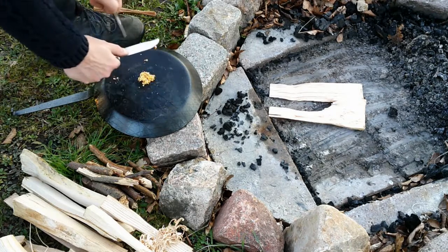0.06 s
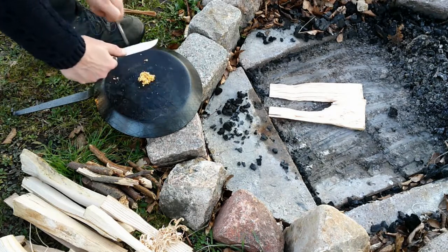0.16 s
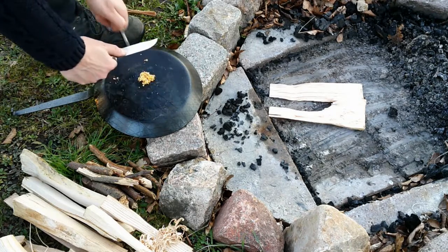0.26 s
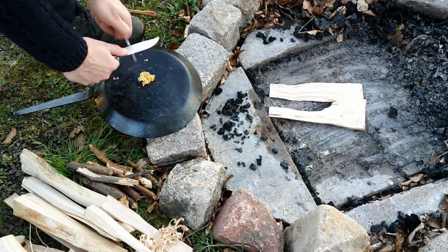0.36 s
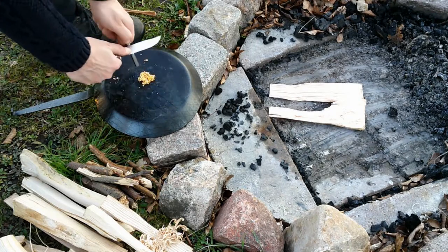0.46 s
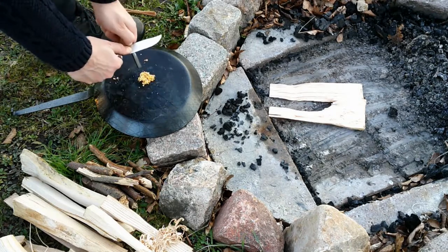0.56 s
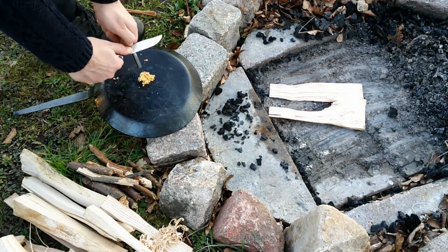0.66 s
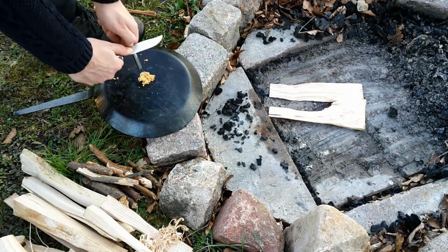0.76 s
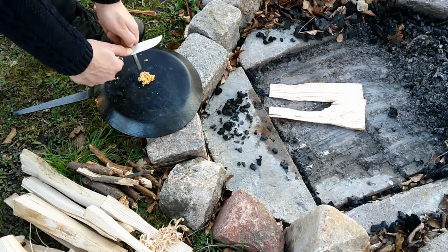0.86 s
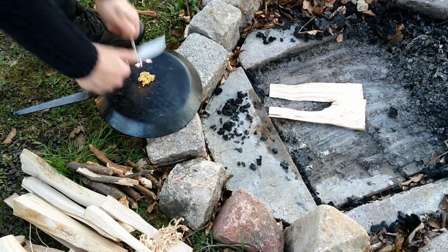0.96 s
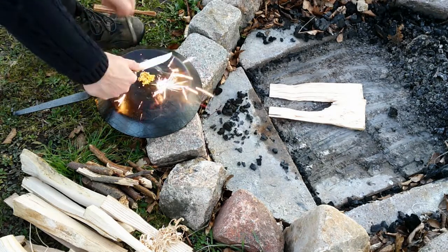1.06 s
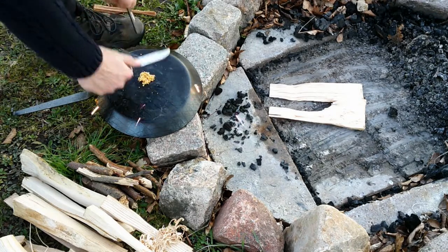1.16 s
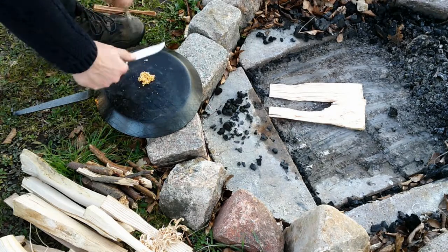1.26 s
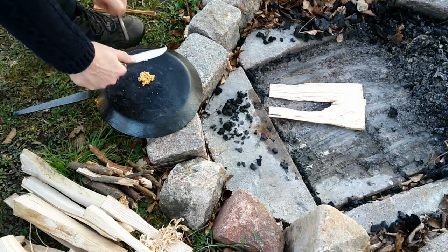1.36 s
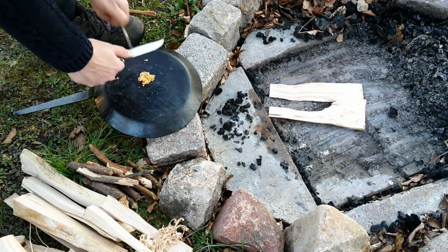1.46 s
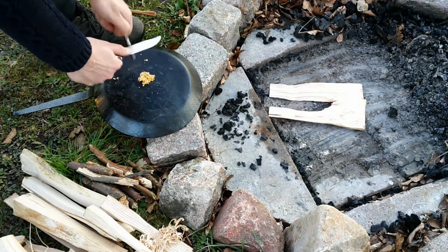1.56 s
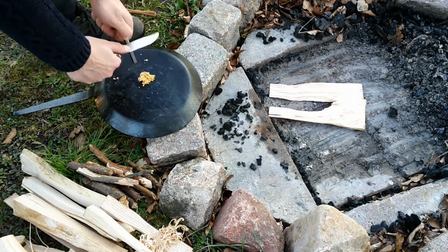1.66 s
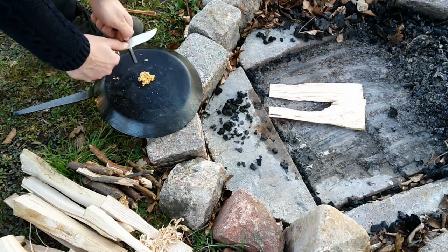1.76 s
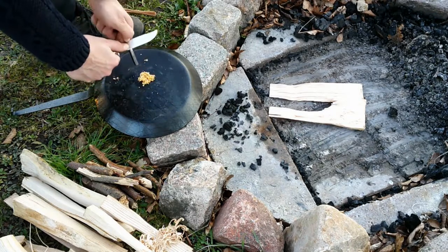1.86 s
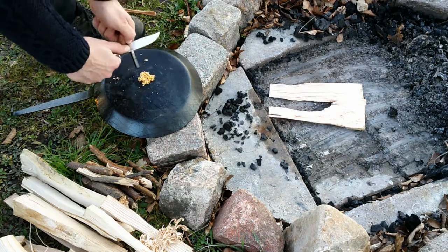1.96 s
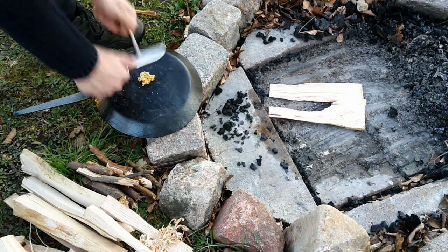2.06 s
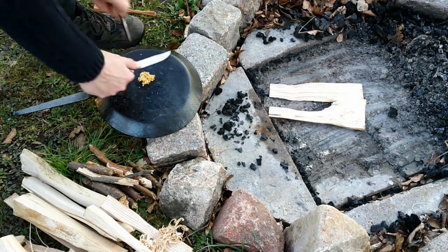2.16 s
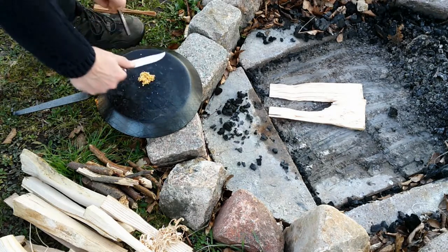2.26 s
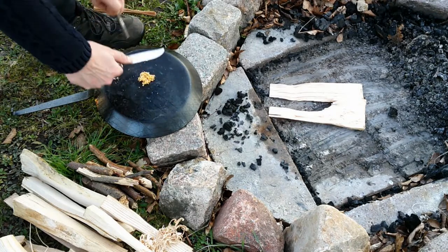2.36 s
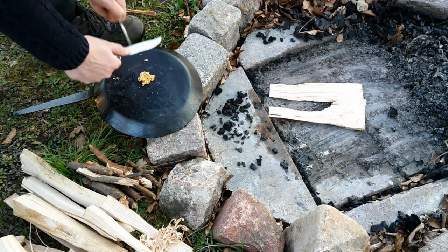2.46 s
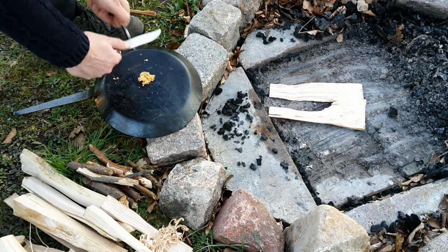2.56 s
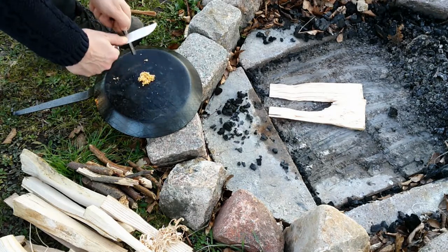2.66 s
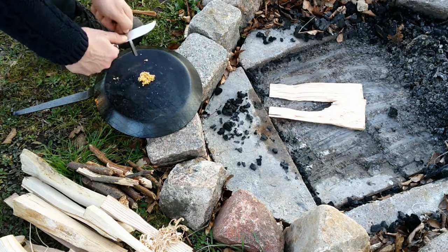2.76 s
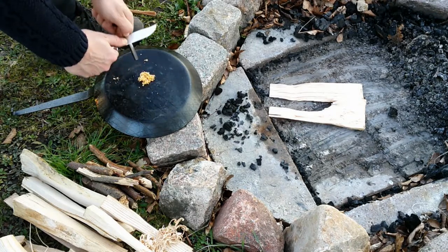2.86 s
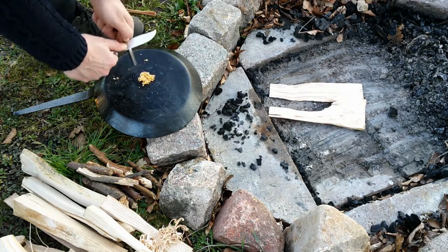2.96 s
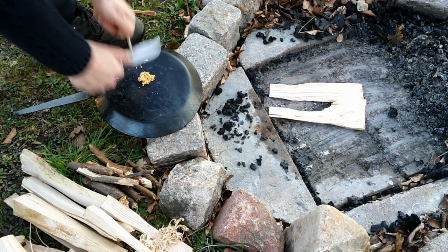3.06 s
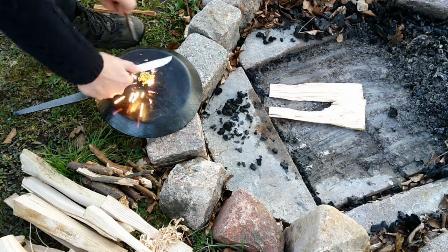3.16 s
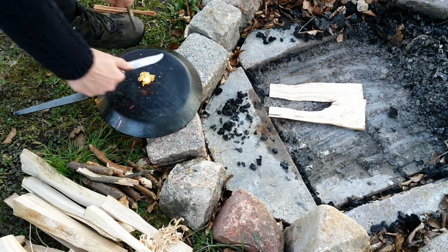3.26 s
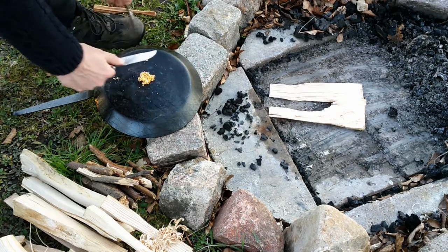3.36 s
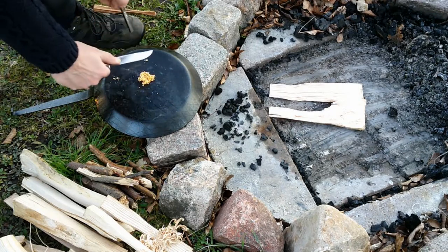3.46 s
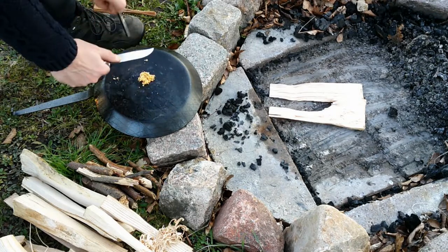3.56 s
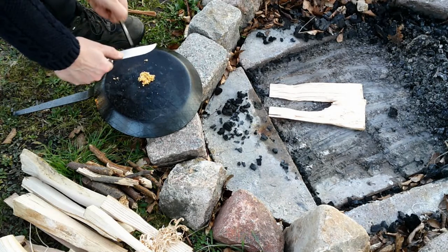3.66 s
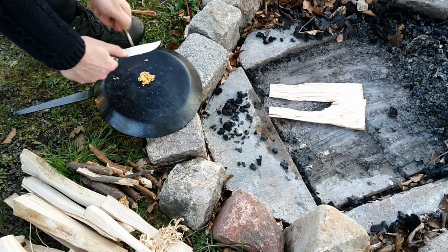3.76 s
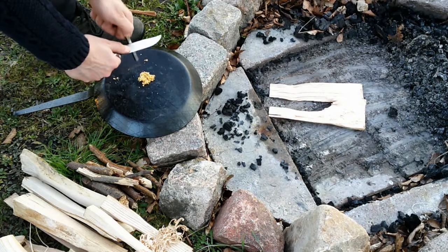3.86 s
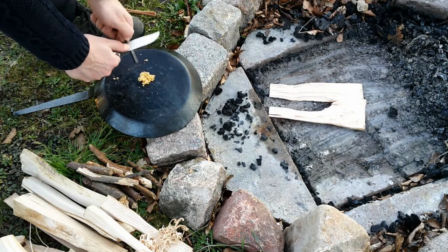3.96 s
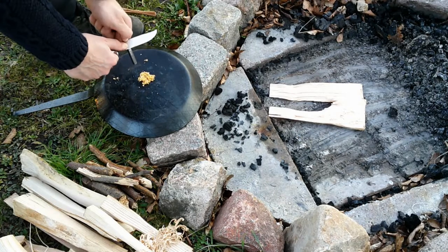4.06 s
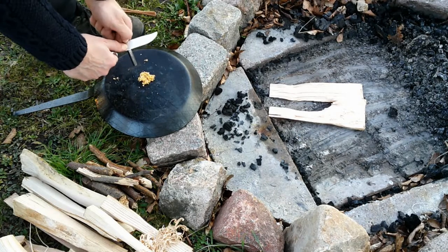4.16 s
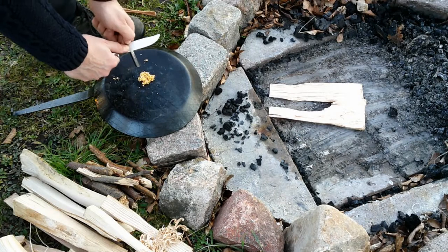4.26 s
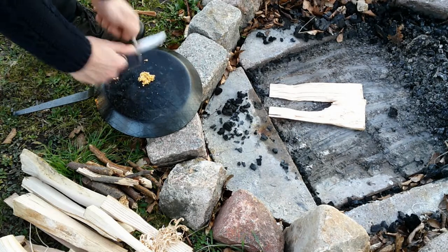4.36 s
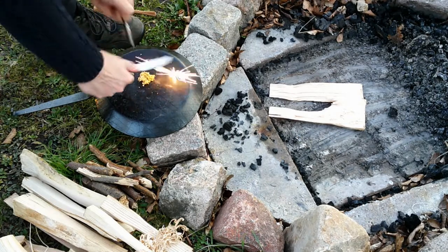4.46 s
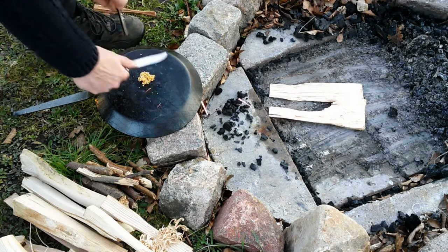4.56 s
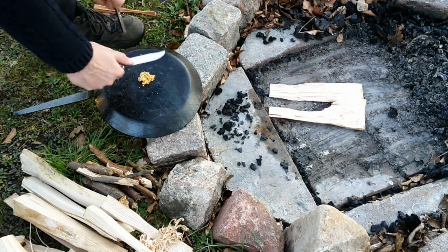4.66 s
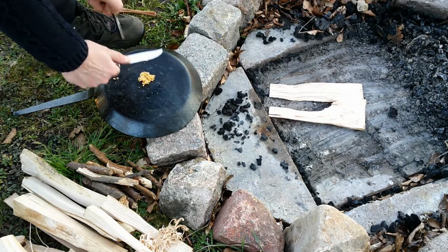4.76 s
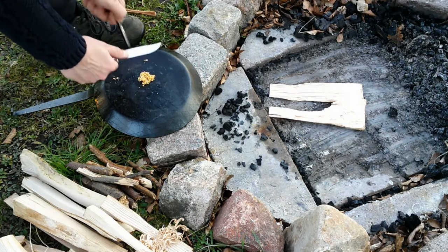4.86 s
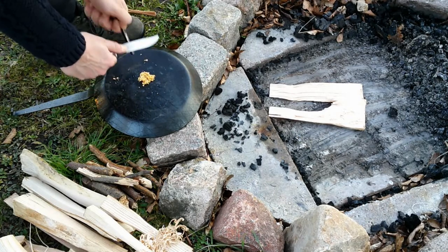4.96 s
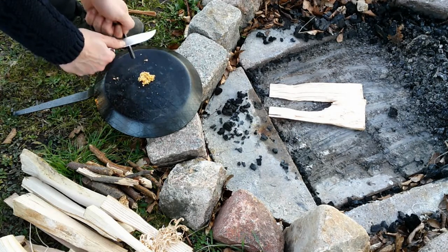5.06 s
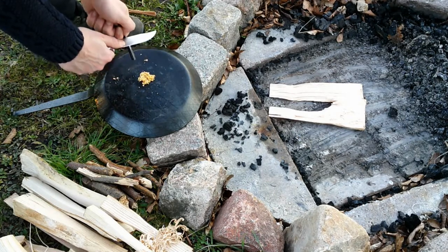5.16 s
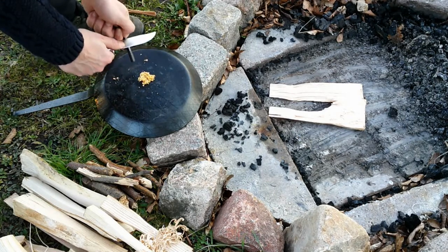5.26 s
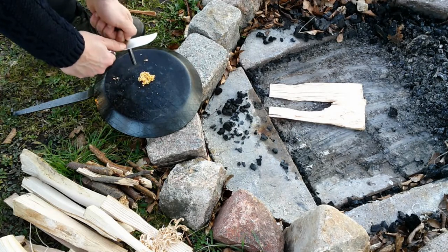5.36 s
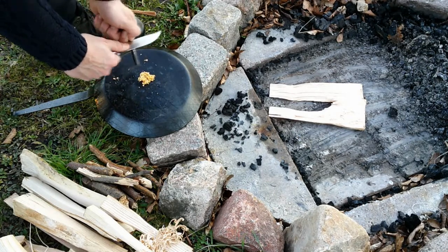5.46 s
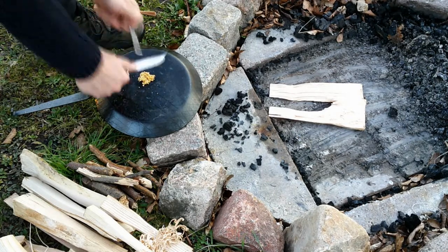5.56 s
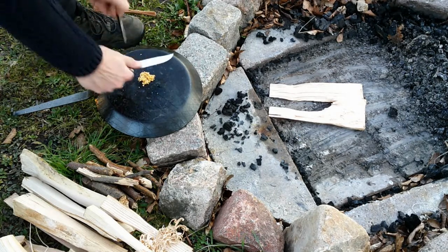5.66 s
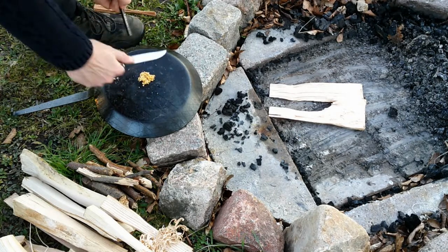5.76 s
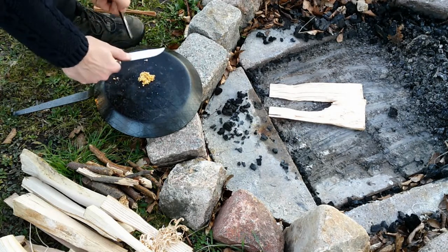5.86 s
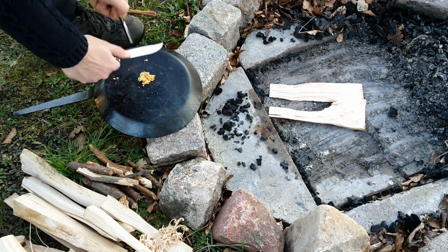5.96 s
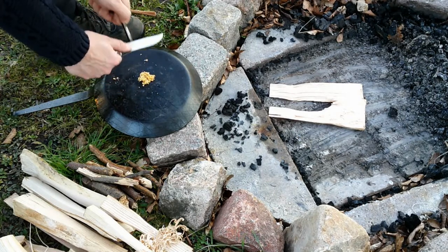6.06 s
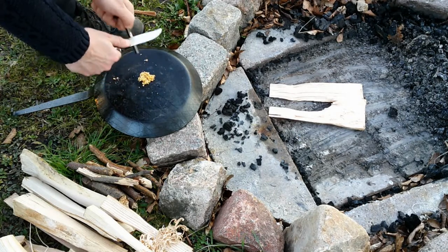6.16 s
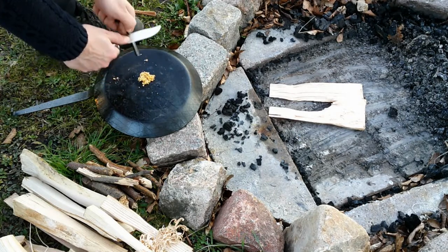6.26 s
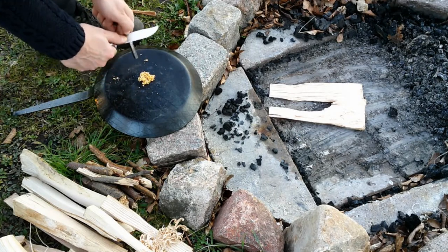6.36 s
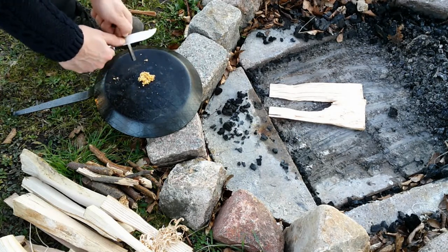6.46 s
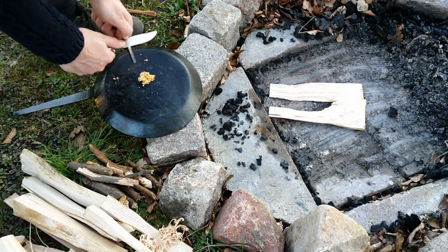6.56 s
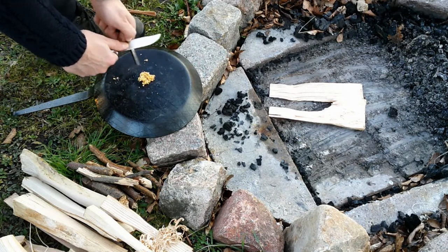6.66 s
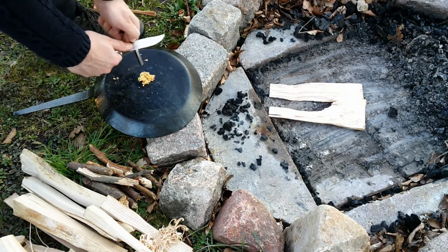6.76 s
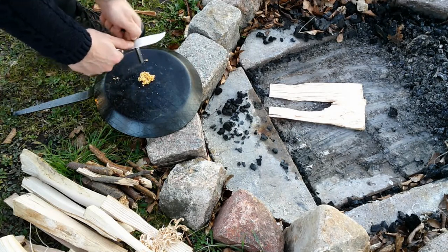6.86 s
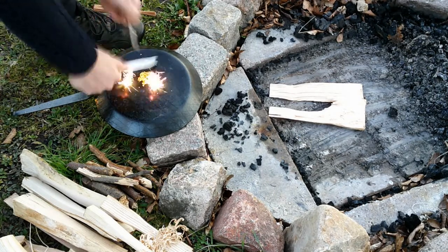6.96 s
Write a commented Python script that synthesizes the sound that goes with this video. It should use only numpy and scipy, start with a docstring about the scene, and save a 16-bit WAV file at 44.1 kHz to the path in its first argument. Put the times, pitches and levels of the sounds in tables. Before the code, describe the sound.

Close and nearly dry, a knife edge rasps down a fire-starting rod six times, about once every second or so. Each scrape is a very short, gritty, bright metallic zip, often followed by a soft puff and crackling fizz of sparks. Between strokes the blade clicks lightly on the rod with a tiny steel ring. Far off in trees, small birds trill, whistle and twitter above a very low outdoor rumble.

```python
"""A knife is scraped hard down a firesteel six times, close by, over an upturned steel pan outdoors.
Each rasp is coloured grit shaped by the force; sparks puff, fizz and snap, and the blade taps the rod as a
short click with a ringing steel. Far off in the trees small birds sing, as gliding sine tones.
Behind it all lies a low, distant rumble of shaped noise; the camera takes in no treble above 9 kHz."""
import sys
import numpy as np
from scipy import signal
from scipy.fft import rfft, irfft, next_fast_len
from scipy.io import wavfile
from scipy.ndimage import map_coordinates

SR = 44100
rng = np.random.default_rng(int(sys.argv[2]) if len(sys.argv) > 2 else 0)


def log_audio(samples):
    """Write samples as a 16-bit WAV file to the path given in sys.argv[1]."""
    # one column per channel
    frames = np.atleast_2d(samples).T
    # limit to full scale, then quantise
    limited = np.clip(frames, -1, 1)
    pcm = np.round(limited * 32767).astype(np.int16)
    wavfile.write(sys.argv[1], SR, pcm)


N = 309582

# strokes of the blade: (bite time [s], length [s], body level [dB], treble over body [dB],
#   swell of the force in mid-stroke [dB], tilt [dB per octave], freedom to ring [1 = usual],
#   pitch this hold damps least [Hz], pitch it damps most [Hz])
STROKES = [(.975, 0.028, -28.5, -15.5, 2, -2.5, 1, 2570, 2950),
           (2.061, .027, -21.5, -11.5, 10, 0, 1.17, 2720, 1160),
           (3.08, .023, -22.3, -15.5, 11, -1, 1.1, 1750, 2560),
           (4.402, .024, -23, -10, 2, 1, .9, 2320, 2870),
           (5.558, 0.015, -23.5, -16.5, 4, -2, 1.54, 1280, 2870),
           (6.949, .019, -20, -10.5, 2, .2, .9, 1490, 1080)]
# resonances of blade and rod pressed together: (pitch [Hz], width [Hz], lift at usual freedom [dB])
BLADE_RESONANCES = [(1220, 330, 6), (1812, 266, 9.5), (2543, 160, 12.5), (3770, 410, 8.5), (2794, 140, 7),
                    (670, 120, 4.5), (2327, 57, -1), (1502, 110, -4), (4480, 99, -2.5), (5280, 266, 17),
                    (6340, 600, 9), (7870, 330, 13)]
# the rasp under those resonances: (frequency [Hz], relative density [dB per Hz])
RASP_SPECTRUM = [(100, -41.5), (300, -22), (550, -17), (850, -10), (1150, -3.5), (1700, 0), (2200, -2),
                 (3200, -5), (4600, -15), (5700, -7.5), (7200, -14), (9000, -23)]
# the edge gliding lightly: (frequency [Hz], relative density [dB per Hz])
SKIM_SPECTRUM = [(300, -9.5), (1200, 0), (2600, -4.5), (4500, -4.5), (5500, -10), (7000, -8.5), (8500, -18)]
GRIP_S, GRIP_DB = .0095, -16.5  # the edge grips this long before it bites, with this much force
SKIM_S, SKIM_DB = .033, -48  # the light glide before the grip
HARDEST_SHARE, EASE_DB = 0.31, -3  # force peaks at this share of the stroke; slip-off force over bite force
TILT_FROM_HZ, SPLIT_HZ = 700, 4400  # the tilt runs between these; treble lies above the second
FREE_DB, DAMPED_DB, HOLD_WIDTH_HZ = 4, -6, 250  # ring gained and lost around the hold's two pitches

# flares of burning sparks: (time [s], length [s], puff level [dB])
FLARES = [(1.009, 0.025, -41), (1.04, .034, -51), (3.108, 0.026, -45), (3.144, 0.015, -48),
          (3.221, 0.04, -55.5), (4.43, .022, -49.5), (5.627, 0.011, -58.5), (6.976, .039, -49.5)]
# puff of a flare: (frequency [Hz], relative density [dB per Hz])
PUFF_SPECTRUM = [(150, -21.5), (450, -12.5), (800, 4), (1300, -2), (1800, -7), (2600, 1.5), (4200, -7.5),
                 (6000, -18.5)]
# fizz of a flare: (frequency [Hz], relative density [dB per Hz])
FIZZ_SPECTRUM = [(2500, -32), (4500, -20), (5400, 4), (6400, 9.5), (7200, -5), (8500, -18.5)]
FIZZ_DB = -4.5  # fizz over puff
# single sparks bursting: (time [s], relative level [dB])
POPS = [(1.011, -33), (3.23, -33), (3.244, -34), (3.2497, -35.5), (3.285, -42.5), (3.344, -40),
        (4.472, -43)]

# blade touching the rod: (time [s], peak level of the click [dB])
TAPS = [(0.438, -36), (0.9648, -27.5), (1.6307, -34), (2.6787, -29.5), (3.887, -35.5), (4.366, -49),
        (5.0606, -35), (5.541, -35), (6.1671, -31)]
# click of the edge on the rod: (frequency [Hz], relative density [dB per Hz])
CLICK_SPECTRUM = [(300, -28), (1200, -9.5), (1800, -1), (2700, -2.5), (4500, -12), (6500, -7), (8500, -22)]
# modes of the lightly held steel: (pitch [Hz], typical relative level [dB], t60 [s])
STEEL_MODES = [(1230, -7.5, 0.048), (1483, -29, .1), (1776, 2, 0.056), (2120, -14.5, 0.061),
               (2510, -2.5, 0.063), (2900, -7, 0.059), (3450, -6.5, .05), (3900, -10, .03),
               (5330, -4, 0.043), (6220, -9.5, 0.041)]

# trills: (start [s], number of notes, first interval [s], first pitch [Hz], first level [dB], last level [dB])
TRILLS = [(-.011, 7, .096, 4120, -53.5, -58.5), (5.227, 11, .0892, 4480, -57, -52.5)]
# one scoop of the trill: (time into the note [s], pitch over the dip [ratio], relative level [dB])
SCOOP = [(0, 1.1, -12), (.009, 1.03, -4), (.019, 1.0, 0), (.029, 1.015, 0), (.042, 1.085, 1),
         (.052, 1.155, 0), (.06, 1.185, -15)]
TRILL_HZ, TRILL_SETTLE_S = 4040, .23  # pitch the run settles to, and its time constant
TRILL_SLOWING_S = 0.0011  # growth of the interval per note
TRILL_NARROWING = 2.4  # exponent: a higher note scoops less widely
# two-note song, each note's turn: (first time [s], middle pitch [Hz], level [dB], repeats)
SEESAW = [(2.075, 4173, -61.5, 6), (2.338, 3094, -63.5, 5)]
SEESAW_PERIOD_S, SEESAW_NOTE_S = .47, 0.072
SEESAW_SAG = 0.028  # fall over one note, as a share of its pitch
# thin, high calls: (time [s], length [s], pitch held [Hz])
THIN_CALLS = [(4.171, 0.14, 7220), (4.41, 0.19, 7170), (4.643, 0.18, 7300)]
THIN_DB, THIN_SCOOP, THIN_SCOOP_S = -60, .2, .009  # starts this share below its pitch; time constant of the rise
# slurred whistles: (time [s], length [s], start pitch [Hz], end pitch [Hz], arch [share of pitch], level [dB])
SLURS = [(0.146, .095, 2900, 3020, .04, -64), (1.124, 0.083, 5200, 4900, -0.0017, -61),
         (1.266, 0.087, 3250, 3240, -0.039, -54), (1.346, 0.13, 3278, 3290, -0.00042, -52.5),
         (1.564, 0.1, 5310, 4830, -.012, -56), (1.693, 0.071, 4890, 4850, 0, -59),
         (1.84, 0.19, 3140, 3090, .01, -55), (2.313, 0.057, 4540, 4630, 0.076, -54.5),
         (2.421, .118, 5340, 3210, 0.024, -53.5), (4.948, .11, 5270, 5370, .025, -56),
         (5.062, 0.12, 5450, 5390, 0.017, -62.5), (5.153, 0.081, 5350, 5150, -.02, -60),
         (6.275, 0.15, 2800, 3115, -0.0028, -63.5), (6.598, 0.072, 2850, 3100, .02, -61.5)]
# bouts of twittering: (start [s], end [s], mean spacing [s], typical pitch [Hz], level [dB])
TWITTER = [(2.192, 2.32, 0.097, 4020, -56), (2.619, 2.64, .025, 3400, -62),
           (2.699, 2.79, 0.023, 3450, -59.5), (6.295, 6.54, 0.029, 3790, -57),
           (6.585, 6.78, .079, 3833, -56.5), (6.81, 6.9, 0.033, 3980, -57.5)]
CHIRP_S, CHIRP_BEND = .016, .27  # length of one chirp; curvature of its pitch

# scattered tail among the trees: (frequency [Hz], t60 [s])
TREE_DECAY = [(500, 0.55), (3000, 0.99), (8000, 0.71)]
# distant rumble and thin hiss: (frequency [Hz], relative density [dB per Hz])
AIR_SPECTRUM = [(12, -29.5), (22, -7), (50, -7.5), (90, -3.5), (135, -1.5), (200, -3.5), (340, -8.5),
                (780, -9.5), (1450, -13), (2600, -16), (3520, -21), (5200, -27), (7300, -22.5), (8800, -38)]
ROLL_HZ, TOP_HZ = 8050, 9050  # start of the camera's roll-off, and its limit


def amp(db):
    """Decibels to amplitude."""
    return 10 ** (np.asarray(db) / 20)


def unit(x):
    """x brought to an rms of 1."""
    return x / np.sqrt(np.mean(x ** 2) + 1e-20)


def along(points, hz):
    """Values at hz between (frequency, value) points on a log axis."""
    f, v = np.transpose(points)
    return np.interp(np.log(hz + 1), np.log(f + 1), v)


def seconds(length):
    """A time axis."""
    return np.arange(int(length * SR)) / SR


def add(track, s, x):
    """Mix x into the track from time s, cut to the track's ends."""
    start = round(s * SR)
    x = x[max(-start, 0):max(N - start, 0)]
    track[max(start, 0):][:len(x)] += x


def wobble(rate, t):
    """A smooth random curve, rate knots a second."""
    return map_coordinates(rng.standard_normal(1024), [t * rate], mode="wrap")


def coloured(x, gain_db, size=4096):
    """x through the causal minimum-phase filter with this dB gain over frequency."""
    gain = amp(gain_db(np.fft.rfftfreq(size, 1 / SR)))
    cepstrum = irfft(np.log(gain + 1e-6))
    # fold the cepstrum onto positive times
    cepstrum[1:size // 2] *= 2
    cepstrum[size // 2 + 1:] = 0
    impulse = irfft(np.exp(rfft(cepstrum)))
    return signal.fftconvolve(x, impulse)[:len(x)]


def grit(t, rate, spread_db):
    """Tiny fractures at random moments, rate a second, their sizes spread by spread_db; rms 1."""
    happens = rng.random(len(t)) < rate / SR
    sign = np.sign(rng.standard_normal(len(t)))
    size = amp(spread_db * rng.standard_normal(len(t)))
    return unit(happens * sign * size)


def strokes(edge=0.0039, release=0.0045, grab_db=4, brighten_db=3, dull_db=-8, damp_db=-12):
    """The edge skims the rod, grips, bites, tears off chips and slips off the end."""
    out, t = np.zeros(N), seconds(.16)
    highpass = signal.butter(4, SPLIT_HZ, "high", fs=SR, output="sos")
    for bite, length, db, treble_db, swell_db, tilt_db, freedom, free_hz, damped_hz in STROKES:
        grip, hardest, off = bite - GRIP_S, bite + HARDEST_SHARE * length, bite + length
        start = grip - SKIM_S
        now = start + t

        # the hands damp the lower resonances differently on each stroke
        peaks = [(f, width, lift * (freedom if f < SPLIT_HZ else 1)) for f, width, lift in BLADE_RESONANCES]
        peaks += [(free_hz, HOLD_WIDTH_HZ, FREE_DB), (damped_hz, HOLD_WIDTH_HZ, DAMPED_DB)]

        def ring_db(hz):
            return sum(lift / (1 + (2 * (hz - f) / width) ** 2) for f, width, lift in peaks)

        def lean_db(hz):
            return tilt_db * np.log2(np.clip(hz, TILT_FROM_HZ, SPLIT_HZ) / TILT_FROM_HZ)

        # a light hiss swells, then fades between grip and bite
        glide = np.tanh(2 * t / SKIM_S) * np.clip((bite - now) / GRIP_S, 0, 1)
        hiss = glide * grit(t, rate=4400, spread_db=1.0)
        skim = coloured(hiss, lambda hz: along(SKIM_SPECTRUM, hz) + ring_db(hz))
        add(out, start, amp(SKIM_DB) * unit(skim) * np.sqrt(np.mean(glide ** 2)))

        # the force jumps at the grip and again at the bite
        moments = np.sort([grip - edge, grip, bite - edge, bite, hardest, off, off + release, off + 2 * release])
        levels_db = [-90, GRIP_DB, GRIP_DB + grab_db, -swell_db, 0, EASE_DB - swell_db, -26, -90]
        force_db = np.interp(now, moments, levels_db)
        chips = amp(force_db + wobble(299.4, t)) * grit(t, rate=7000, spread_db=2.5)
        rasp = coloured(chips, lambda hz: along(RASP_SPECTRUM, hz) + ring_db(hz) + lean_db(hz))
        treble = signal.sosfiltfilt(highpass, rasp)
        body = rasp - treble

        # the treble sets in with the bite, grows in flurries as the blade gathers speed, drops after contact
        waiting = np.clip((bite - now) / edge, 0, 1)
        speed = np.clip((now - hardest) / length, -.5, .5) * 2
        parted = np.clip((now - off) / edge - 1, 0, 1)
        flurries_db = 2.6 * wobble(330, t)
        treble = treble * amp(dull_db * waiting + brighten_db * speed + damp_db * parted + flurries_db)

        # levels refer to the time between bite and slip-off
        contact = np.sqrt(length / t[-1])
        add(out, start, amp(db) * (unit(body) + amp(treble_db) * unit(treble)) * contact)
    return out


def sparks(edge=0.0036, ember_db=-16, ember_s=.025):
    """Hot shavings flare with a soft puff and a fine, spiky fizz, then smoulder briefly."""
    out, t = np.zeros(N), seconds(.14)
    for s, length, db in FLARES:
        after = np.maximum(t - length, 0)
        smoulder = amp(ember_db) * np.exp(-after / ember_s)
        burn = np.minimum(t / edge, 1) * np.maximum(np.exp(-after / edge), smoulder)
        puff = coloured(burn * grit(t, rate=3500, spread_db=7.5), lambda hz: along(PUFF_SPECTRUM, hz))
        fizz = coloured(burn * grit(t, rate=2200, spread_db=3.5), lambda hz: along(FIZZ_SPECTRUM, hz))
        flare = unit(puff) + amp(FIZZ_DB) * unit(fizz)
        add(out, s, amp(db) * flare * np.sqrt(np.mean(burn ** 2)))
    return out


def pops(t60=.006, level_db=-2):
    """A glowing chip bursts with a tiny snap: fast-dying grit, as bright as puff and fizz together."""
    out, t = np.zeros(N), seconds(.02)
    for s, db in POPS:
        burst = amp(-60 * t / t60) * grit(t, rate=8500, spread_db=7)
        snap = coloured(burst, lambda hz: np.maximum(along(PUFF_SPECTRUM, hz), along(FIZZ_SPECTRUM, hz)))
        add(out, s, amp(db + level_db) * snap / np.abs(snap).max())
    return out


def taps(chatter_t60=0.018, ring_db=-13):
    """The edge lands on the rod, chatters for a few milliseconds and leaves a faint ring of steel modes."""
    out, t = np.zeros(N), seconds(.25)
    for s, db in TAPS:
        chatter = amp(-60 * t / chatter_t60) * grit(t, rate=6000, spread_db=0.0)
        click = coloured(chatter, lambda hz: along(CLICK_SPECTRUM, hz))
        ring = np.zeros(len(t))
        for hz, mode_db, t60 in STEEL_MODES:
            struck_db = mode_db + 2 * rng.standard_normal()  # each touch excites the modes differently
            ring += amp(struck_db - 60 * t / t60) * np.sin(2 * np.pi * (hz * t + rng.random()))
        add(out, s, amp(db) * (click / np.abs(click).max() + amp(ring_db) * ring))
    return out


def birds():
    """Five kinds of song overlap."""
    return trills() + seesaw() + thin_calls() + slurs() + twitter()


def whistle(hz, waver=0.0021, flutter_db=1):
    """One pure note along this pitch curve; it swells, flutters and fades."""
    t = np.arange(len(hz)) / SR
    swell = np.sqrt(np.abs(np.sin(np.pi * t / t[-1]))) * amp(flutter_db * wobble(76, t))
    pitch = hz * (1 + waver * wobble(130, t))
    return np.sqrt(2) * swell * np.sin(2 * np.pi * np.cumsum(pitch) / SR)


def trills():
    """One scooped note, repeated; the run slows a little and sinks to a steady pitch."""
    out = np.zeros(N)
    when, ratio, shape_db = np.transpose(SCOOP)
    t = seconds(when[-1])
    bend = np.polyval(np.polyfit(when, ratio, 4), t)  # a smooth curve near the points
    for start, count, interval, first_hz, first_db, last_db in TRILLS:
        s = start
        for k, db in enumerate(np.linspace(first_db, last_db, round(count))):
            hz = TRILL_HZ + (first_hz - TRILL_HZ) * np.exp((start - s) / TRILL_SETTLE_S)
            scoop = bend ** ((TRILL_HZ / hz) ** TRILL_NARROWING)
            pitch = hz * scoop * (1 + 0.0046 * wobble(127, t))
            level_db = db + np.interp(t, when, shape_db) + wobble(80, t)
            add(out, s, np.sqrt(2) * amp(level_db) * np.sin(2 * np.pi * np.cumsum(pitch) / SR))
            s += interval + k * TRILL_SLOWING_S
    return out


def seesaw():
    """A far bird alternates two slightly sagging notes at an even pace."""
    out, t = np.zeros(N), seconds(SEESAW_NOTE_S)
    sag = 1 + SEESAW_SAG * (.5 - t / SEESAW_NOTE_S)
    for first, hz, db, count in SEESAW:
        for k in range(round(count)):
            add(out, first + k * SEESAW_PERIOD_S, amp(db) * whistle(hz * sag))
    return out


def thin_calls(waver=.006):
    """Each call scoops up to a very high note and holds it, a little unsteadily."""
    out = np.zeros(N)
    for s, length, hz in THIN_CALLS:
        scoop = 1 - THIN_SCOOP * np.exp(-seconds(length) / THIN_SCOOP_S)
        add(out, s, amp(THIN_DB) * whistle(hz * scoop, waver=waver))
    return out


def slurs(waver=0.0051, warble=.12):
    """Whistles that arch from one pitch to another; wide glides warble more."""
    out = np.zeros(N)
    for s, length, first_hz, last_hz, arch, db in SLURS:
        u = seconds(length) / length
        glide = (first_hz + (last_hz - first_hz) * u) * (1 + arch * np.sin(np.pi * u))
        unsteady = waver + warble * np.log(last_hz / first_hz) ** 2
        add(out, s, amp(db) * whistle(glide, waver=unsteady))
    return out


def twitter(scatter_s=0.0037, pitch_spread=0.022):
    """Tiny chirps at an uneven pace, their pitch curved about a dip at a different point in each."""
    out, u = np.zeros(N), seconds(CHIRP_S) / CHIRP_S
    for start, end, spacing, hz, db in TWITTER:
        for s in np.arange(start, end, spacing):
            late, higher, skew = rng.standard_normal(3)
            bend = 1 + CHIRP_BEND * (u - .62 - .17 * skew) ** 2
            pitch = hz * (1 + pitch_spread * higher) * bend
            add(out, s + scatter_s * late, amp(db) * whistle(pitch))
    return out


def trees(x):
    """Trunks and leaves scatter a tail: noise dying at its own pace in each band, of unit energy."""
    hz, t, z = signal.stft(rng.standard_normal(SR // 2), SR, nperseg=256)
    decay = amp(-60 * t / along(TREE_DECAY, hz)[:, None])
    tail = signal.istft(z * decay, SR, nperseg=256)[1]
    return signal.fftconvolve(x, tail / np.linalg.norm(tail))[:N]


def air(level_db=-56, drift_db=0.1):
    """Distant rumble and a thin hiss: shaped noise, drifting a little in level."""
    m = next_fast_len(N + 8192)
    spectrum = rfft(rng.standard_normal(m)) * amp(along(AIR_SPECTRUM, np.fft.rfftfreq(m, 1 / SR)))
    noise = irfft(spectrum, m)[:N]
    return unit(noise) * amp(level_db + drift_db * wobble(3.13, np.arange(N) / SR))


def scene():
    """The fire-lighting is close and almost dry; the birds are far off among the trees."""
    near = strokes() + sparks() + pops() + taps()
    far = birds()
    mix = near + amp(-30.5) * trees(near) + far + amp(-9.5) * trees(far) + air()
    return mix[None]


def record(dry):
    """The camera's band rolls off quickly and ends at its limit."""
    m = next_fast_len(N + 8192)
    hz = np.fft.rfftfreq(m, 1 / SR)
    roll_db = -42 * np.clip((hz - ROLL_HZ) / (TOP_HZ - ROLL_HZ), 0, 1) ** 2.7
    return irfft(rfft(dry, m) * amp(roll_db) * (hz < TOP_HZ), m)[..., :N]


dry = scene()
out = record(dry)
log_audio(out)
```